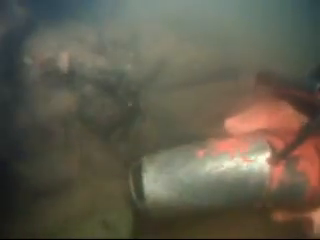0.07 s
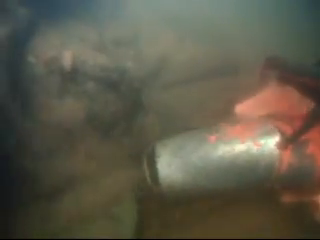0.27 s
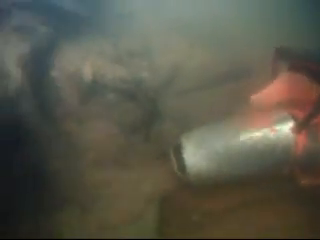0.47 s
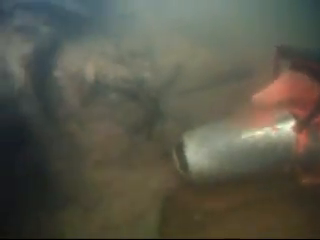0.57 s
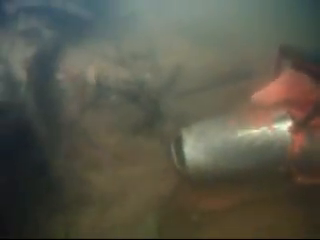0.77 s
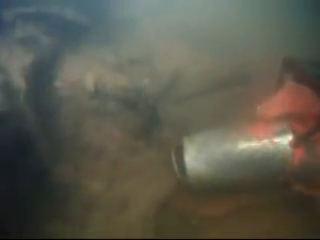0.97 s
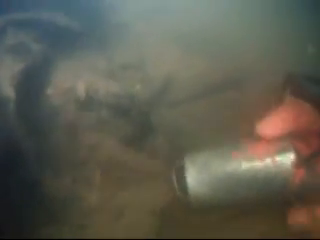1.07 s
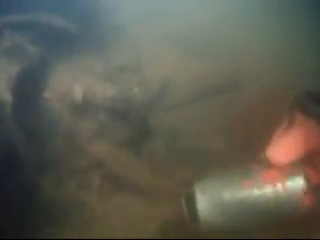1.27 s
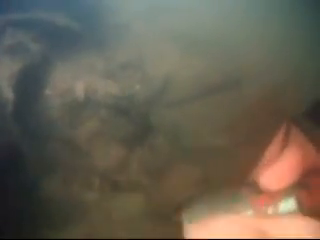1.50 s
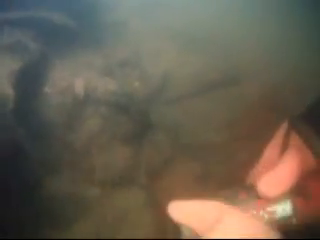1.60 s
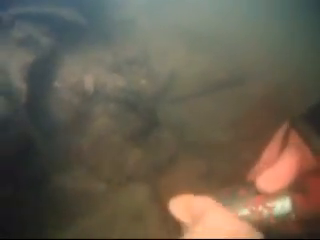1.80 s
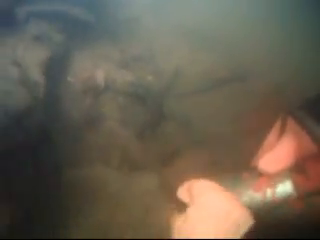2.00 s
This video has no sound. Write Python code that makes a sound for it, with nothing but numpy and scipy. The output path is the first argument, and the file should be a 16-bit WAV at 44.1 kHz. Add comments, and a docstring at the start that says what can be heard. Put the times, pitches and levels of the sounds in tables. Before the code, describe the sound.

A suction dredge draws in stones from a riverbed, with irregular metallic clinks and a continuous gravel rattle. Water gurgles and rumbles around the close, submerged microphone, whose casing takes a few light bumps, then several louder knocks.

```python
"""A suction dredge draws stones from a gravel bed, heard under water from inside a camera housing.
Single stones clink on the metal nozzle, each impact exciting the modes of both bodies, and gravel
rattles along the hose. Water churns and glugs at the intake over the rumble of the current.
Knocks and soft bumps ring the housing; the narrow-band recorder overloads on the hardest one."""
import sys
import numpy as np
from scipy import signal
from scipy.fft import rfft, irfft, next_fast_len
from scipy.io import wavfile
from scipy.ndimage import uniform_filter1d, minimum_filter1d

SR = 44100
rng = np.random.default_rng(int(sys.argv[2]) if len(sys.argv) > 2 else 0)


def generate_wav(sig):
    """Save sig (samples, or channels by samples) to the path in sys.argv[1] as 16-bit PCM at SR."""
    pcm = np.round(np.clip(np.atleast_2d(sig).T, -1, 1) * 32767).astype(np.int16)
    wavfile.write(sys.argv[1], SR, pcm)


N = 90404
STRIKE_TIME_S = np.arange(SR // 5) / SR
STONE_T60_S = 0.043

# spectrum of stone striking metal: frequency_hz, relative_db
CLATTER_SPECTRUM = [(200, -16), (600, -5.5), (940, 5.5), (1050, -2.5), (1180, 3), (1300, -7.5), (1520, 6.5),
                    (1900, -0.5), (2200, -9.5), (2300, -14.5), (2420, 4), (2800, 0), (3500, 0.5),
                    (4200, -8.5)]


def amp(db):
    """Decibels to amplitude ratio."""
    return 10 ** (np.asarray(db) / 20)


def unit(x):
    """Normalisation to an rms of 1."""
    return x / np.sqrt(np.mean(x ** 2) + 1e-20)


def add(mix, start_s, sound):
    """Superposition: a sound joins the mix at its start time."""
    part = mix[max(round(start_s * SR), 0):][:len(sound)]
    part += sound[:len(part)]


def colour(x, spectrum, band_hz=3700):
    """Minimum-phase filtering to a given spectrum, with unit mean power gain below band_hz."""
    size = next_fast_len(2 * N)
    hz = np.fft.rfftfreq(size, 1 / SR)
    point_hz, point_db = np.transpose(spectrum)
    gain = amp(np.interp(np.log(hz + 1), np.log(point_hz), point_db))
    gain /= np.sqrt(np.mean(gain[hz < band_hz] ** 2))
    cepstrum = irfft(np.log(gain), size)
    causal_fold = 1 + np.sign(np.fft.fftfreq(size))
    return irfft(rfft(x, size) * np.exp(rfft(cepstrum * causal_fold)), size)[:N]


def mode(hz, db, t60_s, phase=0):
    """Free vibration of a damped oscillator: an exponentially decaying sine."""
    return amp(db - 60 * STRIKE_TIME_S / t60_s) * np.sin(2 * np.pi * (hz * STRIKE_TIME_S + phase))


def burst(t60_s):
    """White noise under an exponential decay."""
    return rng.standard_normal(len(STRIKE_TIME_S)) * amp(-60 * STRIKE_TIME_S / t60_s)


def impacts(per_s, spread_db):
    """A Poisson process of impulses, many small and a few larger."""
    strength = amp(spread_db * np.minimum(rng.exponential(1, N), 3))
    return strength * rng.choice([-1, 1], N) * (rng.random(N) < per_s / SR)


def crack(t60_s, rise_s=0.00021):
    """Dense, heavily damped modes merge into the noise-like crack of a hard contact."""
    t = STRIKE_TIME_S
    grid_hz = np.linspace(200, 4400, 70)[:, None]
    detune, phase = rng.random((2, len(grid_hz), 1))
    hz = grid_hz + detune * (grid_hz[1] - grid_hz[0])
    modes = np.sin(2 * np.pi * (hz * t + phase)).sum(0)
    envelope = (1 - np.exp(-t / rise_s)) * amp(-60 * t / t60_s)
    return unit(modes * envelope) * np.sqrt(np.mean(envelope ** 2))


def nozzle_ring():
    """Modal ringing of the nozzle; random phases stand for different points of contact."""
    # nozzle modes: pitch_hz, level_db, t60_s
    modes = [(1513, -11, .08), (1569, -13.5, .05), (2370, -13.5, 0.031), (2486, -12, 0.087),
             (2835, -31, 0.023), (3560, -19.5, .06)]
    return sum(mode(hz, db, t60_s, rng.random()) for hz, db, t60_s in modes)


def housing_ring(contact_s, shell_db, wall_db):
    """A force pulse excites the housing's modes; longer contact puts less into the high ones."""
    # housing modes, shell first, wall second: pitch_hz, level_db, t60_s
    modes = [(307, -15, .055), (547.9, -9, 0.078), (459.5, -4, 0.012), (388, -15, 0.03),
             (509, -15.5, 0.062), (722, -9.5, 0.021), (906, -16.5, 0.1), (1464, -15, 0.076)]
    boosts_db = [shell_db, wall_db] + [0] * (len(modes) - 2)
    ring = sum(mode(hz, db + boost, t60_s) for (hz, db, t60_s), boost in zip(modes, boosts_db))
    force = np.sin(np.pi * np.minimum(STRIKE_TIME_S / contact_s, 1)) ** 2
    return signal.fftconvolve(ring, force / force.sum())[:len(ring)]


def suction():
    """Amplitude envelopes of the water, gravel and rocks that the suction draws in."""
    # course of the flow: time_s, water_db, gravel_db, rocks_db
    flow = [(0, -33, 5.5, -29), (0.058, -17, -8.5, -22), (.12, -0.5, -3.5, -1.5), (.22, -2, 5.5, -9.5),
            (.28, -3, -3, -3), (.42, 4.5, 1, 4), (0.521, 2, 0, -2.5), (.64, 1, 1, 3), (0.791, 1, -5.5, -4),
            (.85, -6, -3.5, -7), (.96, -1.5, -5.5, -6), (1.049, -4, -1, -5), (1.14, -2.5, -1.5, -3),
            (1.25, 0, 1.5, 3.5), (1.42, 0, 0, 5.5), (1.551, -1.5, 6.5, 5.5), (1.68, -1, -2.5, -1.5),
            (1.75, -2, -7, -3.5), (1.8, -18, -1.5, -22), (2.05, -16.5, -5, -21.5)]
    time_s, *levels_db = np.transpose(flow)
    return [amp(np.interp(np.arange(N) / SR, time_s, db)) for db in levels_db]


def self_noise(level_db=-82):
    """The recorder's noise floor: a faint, steady hiss."""
    # noise density: frequency_hz, relative_db
    spectrum = [(3000, -15), (4300, 7.5), (5000, -3.5), (8000, -10), (9500, -20.5), (16000, -21.5)]
    return amp(level_db) * unit(colour(rng.standard_normal(N), spectrum))


def tick(start_s=1.7, level_db=-42, t60_s=0.019):
    """A filtered noise transient: a faint, thin tick of treble on the hardest knock."""
    # tick spectrum: frequency_hz, relative_db
    spectrum = [(3000, -17), (4200, 0), (5500, -18), (6500, -0.5), (8300, 1.5), (9200, -26), (10500, -4),
                (16000, -20)]
    puff = np.zeros(N)
    add(puff, start_s, burst(t60_s))
    treble = colour(puff, spectrum)
    power = np.sum(treble ** 2) / (SR * t60_s / 10)  # energy over a tenth of the decay time
    return amp(level_db) * treble / np.sqrt(power)


def current(level_db=-39.5):
    """Flow noise: the river presses on the housing with a deep, steady rumble."""
    # rumble density: frequency_hz, relative_db
    spectrum = [(12, -14.5), (28, 6), (45, -0.5), (70, -10), (150, -27), (600, -60)]
    return amp(level_db) * unit(colour(rng.standard_normal(N), spectrum))


def glugs():
    """Pockets of water oscillate at the intake, dying away under a Gaussian envelope."""
    # glugs: start_s, level_db, pitch_hz, decay_cycles
    pockets = [(.095, -22.5, 125, 3), (0.205, -21, 224, 3.7), (0.221, -21.5, 75, 1.5),
               (0.346, -17, 181.4, 2.8), (0.42, -16.5, 207, 3.5), (0.571, -18.5, 86, 2.7),
               (.609, -17, 197, 4), (0.688, -24, 133, 10.5), (0.87, -15, 69, 2), (0.87, -18, 146, 2.8),
               (.98, -13, 108.8, 1.35), (1.078, -18, 98, 1.7), (1.133, -17.5, 138, 2.2),
               (1.179, -14.5, 64.8, 2.3), (1.286, -15, 47, 1.7), (1.397, -16.5, 104, 1.9),
               (1.527, -22.5, 131, 3.5), (1.601, -23, 129, 2.4), (1.675, -21.5, 181.6, 0.94),
               (2.041, -21.5, 70, 0.4)]
    out = np.zeros(N)
    for start_s, db, hz, decay_cycles in pockets:
        cycles = hz * STRIKE_TIME_S
        add(out, start_s, amp(db) * np.sin(2 * np.pi * cycles) * np.exp(-(cycles / decay_cycles) ** 2))
    return out


def churn(gain_db=-28, swing_db=1.5, swing_below_hz=25.1):
    """Turbulence at the nozzle: low noise, made lumpy by slow random amplitude modulation."""
    # churn density: frequency_hz, relative_db
    spectrum = [(15, -25.5), (40, 2), (80, 2), (130, 0), (200, 0), (260, -5), (400, -12.5), (560, -23),
                (700, -14.5), (1200, -32.5), (4000, -69)]
    slow = np.fft.rfftfreq(N, 1 / SR) < swing_below_hz
    swing = unit(irfft(rfft(rng.standard_normal(N)) * slow, N))
    turbulence = colour(rng.standard_normal(N), spectrum)
    return amp(gain_db) * unit(turbulence * amp(swing_db * swing))


def tumbling_rocks(gain_db=-31.5):
    """Random impacts of tumbling rocks excite the housing's modes as dull taps."""
    hits = impacts(per_s=190, spread_db=4)
    tap = housing_ring(contact_s=0.00069, shell_db=0.5, wall_db=-2)
    return amp(gain_db) * unit(signal.oaconvolve(hits, tap)[:N])


def knocks(snap_delay_s=0.001528, thud_db=-17):
    """Impact excitation of the housing: a modal ring, a snap as the contact closes, a dense thud."""
    # knocks and bumps: start_s, level_db, contact_s, shell_db, wall_db, snap_db
    blows = [(0.21, -24.5, 0.00038, -21.5, 18.5, -3), (.3427, -15.5, 0.00037, -20, 12.5, -7.5),
             (.3535, -14, 0.0008, -1, 5.5, -24.5), (.4205, -26, 0.00047, -9, 19.5, -6),
             (.6096, -10, 0.0011, -12, -8.5, -30), (.657, -19.5, 0.00065, -1.5, -3, -8),
             (.767, -19, 0.00039, 4.5, 0.5, -18), (0.791, -21.5, 0.00053, -1.5, -2, -14),
             (1.2802, -5.5, 0.0007, -9.5, -8, -34), (1.3178, -2, 0.00095, -9, 2, 7),
             (1.3242, -4, 0.00032, 7.5, 1.5, -16), (1.3838, -10, 0.00093, -1.5, -16, -28),
             (1.4568, 2, 0.0011, -15, -1.5, -12), (1.496, -14.5, 0.0012, 7, 0, -26),
             (1.6989, -1, 0.00034, 12, -1, 0.5), (1.7045, -5, 0.0012, -18, 2, 2),
             (1.837, -16, 0.0021, -20, -5, -20)]
    # dense low ringing after a knock: frequency_hz, relative_db
    thud_spectrum = [(100, -13.5), (250, -5.5), (350, -5), (520, -8.5), (650, -11), (1000, -9), (2000, -28),
                     (4000, -45)]
    out, thuds = np.zeros((2, N))
    for start_s, db, contact_s, shell_db, wall_db, snap_db in blows:
        add(out, start_s, amp(db) * housing_ring(contact_s, shell_db, wall_db))
        add(out, start_s + snap_delay_s, amp(db + snap_db) * crack(t60_s=0.0053))
        add(thuds, start_s, amp(db) * burst(t60_s=0.09))
    return out + amp(thud_db) * colour(thuds, thud_spectrum)


def gravel(per_s=240, pitches=24, grains_db=-37.5, ring_db=-0.5, hiss_db=-38.5):
    """Shot noise: many pebble impacts on the nozzle merge into a rattle over the hiss of the flow."""
    # hiss density: frequency_hz, relative_db
    hiss_spectrum = [(30, 0), (150, 3), (400, -3), (700, -11), (950, 2.5), (1300, -3), (1520, -1.5),
                     (1800, -6.5), (2300, -7), (2480, -5.5), (2800, 3), (3500, -7), (4200, -14)]
    cracks, rings = np.zeros((2, N))
    for pebble_hz in np.linspace(924, 3603, pitches):
        hits = impacts(per_s / pitches, spread_db=4.5)
        cracks += signal.oaconvolve(hits, crack(t60_s=0.019))[:N]
        ring = nozzle_ring() + mode(pebble_hz, db=-7, t60_s=STONE_T60_S)
        rings += signal.oaconvolve(hits, ring)[:N]
    grains = unit(colour(cracks, CLATTER_SPECTRUM) + amp(ring_db) * rings)
    hiss = unit(colour(rng.standard_normal(N), hiss_spectrum))
    return amp(grains_db) * grains + amp(hiss_db) * hiss


def stones(gain_db=-9.5):
    """Single stones crack against the nozzle, and both bodies ring at their natural frequencies."""
    # stone impacts: start_s, level_db, pitch_hz, crack_t60_s, stone_ring_db
    clinks = [(0.0123, -20, 2460, 0.019, 3.5), (0.1162, -28, 1573, 0.028, 11),
              (0.1325, -12.5, 1523, 0.024, -6), (0.1475, -18, 2530, 0.046, 2.5),
              (0.187, -11.5, 2497, 0.044, 4), (0.195, -15, 2420, 0.077, 6.5),
              (0.2094, -10, 2450, 0.015, 5.5), (0.2155, -7.5, 2535, 0.029, -2),
              (0.2334, -20.5, 2610, 0.035, 7), (0.2917, -24, 2710, 0.025, -1.5),
              (0.3413, -13, 2490, 0.05, 0), (0.4207, -19, 2395, 0.035, 3), (0.4708, -12.5, 1480, 0.035, 1),
              (0.5856, -20, 1590, 0.035, 4), (0.649, -16.5, 1514, 0.081, -1.5),
              (0.6634, -16, 1665, 0.07, -2), (0.7113, -15.5, 1520, 0.04, -4), (0.7259, -17, 1593, 0.039, 2),
              (0.7723, -17.5, 1560, 0.077, -13), (0.7995, -13, 1520, 0.039, 0),
              (0.884, -15, 1524, 0.077, -9), (0.9301, -9.5, 2744, 0.032, -6.5),
              (0.9361, -9.5, 1544, 0.055, -11.5), (0.9653, -18, 3545, 0.11, 2),
              (1.1441, -11, 2750, 0.038, -3), (1.158, -13, 1438, 0.032, 0.5),
              (1.2093, -20, 1506, 0.032, 2.5), (1.2575, -16.5, 1487, 0.029, 3.5),
              (1.3041, -11, 2380, 0.012, -11), (1.3227, -10, 1493, 0.02, 10), (1.4584, -12, 1670, 0.025, 4),
              (1.476, -7.5, 1520, 0.031, 0.5), (1.5214, -12, 2940, 0.016, 7), (1.5289, -6, 2580, 0.043, -6),
              (1.5647, -16.5, 1500, 0.05, -10), (1.6364, -11, 1470, 0.047, -13),
              (1.6902, -17, 1570, 0.041, -11.5), (1.699, -4, 1484, 0.037, -17),
              (1.7433, -13.5, 2330, 0.085, -0.5), (1.7632, -12, 2530, 0.025, 0),
              (1.7684, -8.5, 1490, 0.027, -1), (1.7891, -22, 2410, 0.025, 2),
              (1.8505, -19, 1710, 0.065, -11), (1.882, -21, 2480, 0.11, -14.5),
              (1.9616, -13.5, 1530, 0.022, -6.5)]
    cracks, rings = np.zeros((2, N))
    for start_s, db, hz, crack_t60_s, stone_ring_db in clinks:
        add(cracks, start_s, amp(db) * crack(crack_t60_s))
        add(rings, start_s, amp(db) * (nozzle_ring() + mode(hz, stone_ring_db, STONE_T60_S)))
    return amp(gain_db) * (colour(cracks, CLATTER_SPECTRUM) + rings)


def scene():
    """Superposition of all sources at the microphone, in one channel."""
    water_gain, gravel_gain, rock_gain = suction()
    background = current() + glugs() + water_gain * churn() + rock_gain * tumbling_rocks()
    return (background + gravel_gain * gravel() + stones() + knocks())[None]


def limit(x, ceiling=0.88, window=45):
    """Peak limiting: the gain falls smoothly around peaks that pass the ceiling."""
    gain = minimum_filter1d(ceiling / np.maximum(abs(x), ceiling), 3 * window)
    return x * uniform_filter1d(uniform_filter1d(gain, window), window)


def record(dry, overload=0.85, low_cut_hz=14, edge_hz=16100):
    """Clipping, a telephone-like band and limiting; tick and hiss join before a last low-pass."""
    # response of the recorder: frequency_hz, gain_db
    response = [(3550, 1), (3700, -3.5), (3860, -16), (4000, -27.5), (4200, -39), (4500, -53.5),
                (6000, -66.5), (9000, -86.5)]
    hz = np.fft.rfftfreq(2 * N, 1 / SR)
    high_pass = 1j * hz / (1j * hz + low_cut_hz)
    band = amp(np.interp(hz, *np.transpose(response))) * high_pass
    clipped = np.clip(dry, -overload, overload)
    narrow = irfft(rfft(clipped, 2 * N) * band, 2 * N)[:, :N]
    out = limit(narrow) + tick() + self_noise()
    low_pass = signal.firwin(511, edge_hz, window=("kaiser", 9), fs=SR)
    return signal.oaconvolve(out, low_pass[None], "same")


dry = scene()
out = record(dry)
generate_wav(out)
```